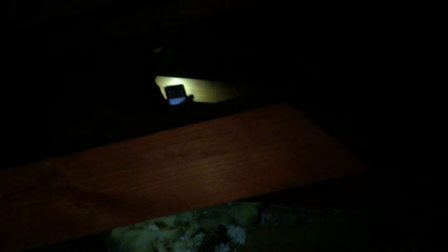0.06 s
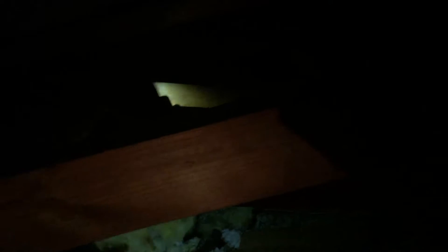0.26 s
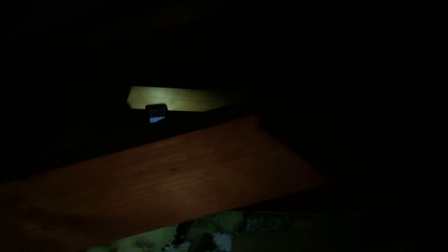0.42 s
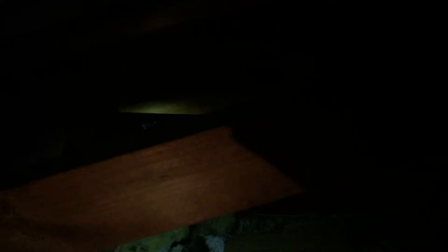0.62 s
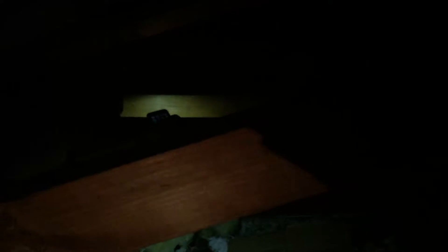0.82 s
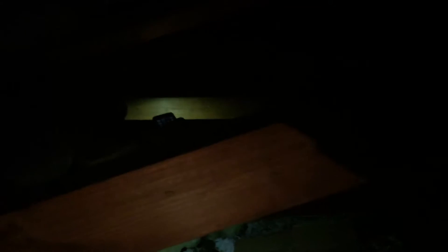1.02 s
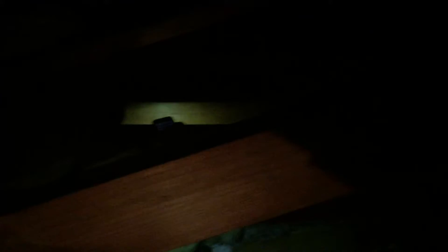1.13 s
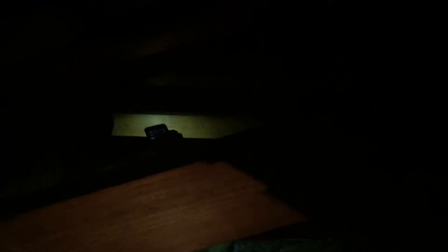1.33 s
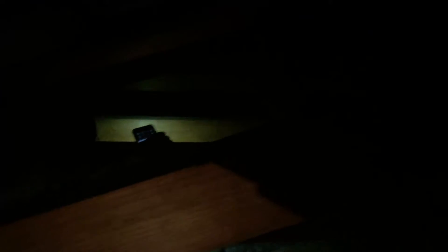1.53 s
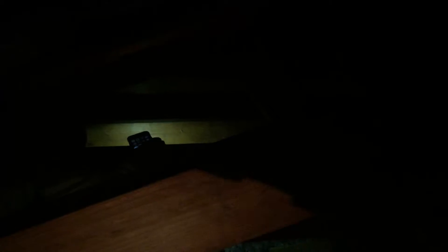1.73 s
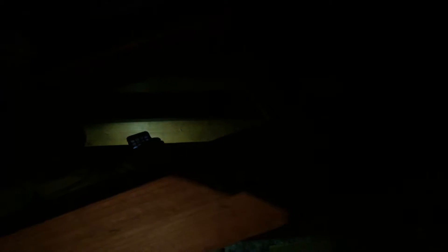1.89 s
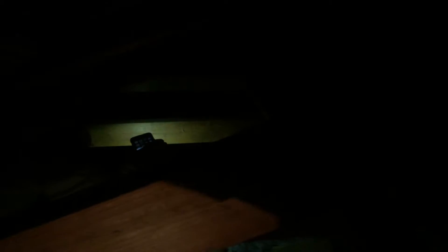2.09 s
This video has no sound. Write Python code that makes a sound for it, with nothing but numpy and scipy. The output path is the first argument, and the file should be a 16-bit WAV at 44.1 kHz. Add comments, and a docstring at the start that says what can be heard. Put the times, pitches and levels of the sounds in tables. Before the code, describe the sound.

Dry, brittle snapping clicks over low microphone handling rumble, then a hollow knock on wood.

```python
"""Shifting about in a cramped attic

A hand-held camera rumbles and is bumped by the hand, over faint hiss, rustling clothes and the tick
of its circuits. Among a few soft scuffs, something dry and brittle snaps in a short run of clicks,
each a crack with a resonant decay and a close echo. Last, a knock rings a board's hollow modes."""
import sys
import numpy as np
from scipy import signal
from scipy.fft import rfft, irfft, next_fast_len
from scipy.io import wavfile

SR = 44100
rng = np.random.default_rng(int(sys.argv[2]) if len(sys.argv) > 2 else 0)


def persist_wave(psi):
    """Save psi, clipped to +-1, as 16-bit WAV."""
    counts = np.round(np.clip(psi, -1, 1) * 32767).astype(np.int16)
    wavfile.write(sys.argv[1], SR, np.atleast_2d(counts).T)


N = 94815
AGE = np.arange(SR // 2) / SR  # time since an event's onset [s]


def amp(db):
    """Amplitude grows tenfold for every 20 dB."""
    return 10 ** (np.asarray(db) / 20)


def unit(x):
    """Normalisation to an rms of 1."""
    return x / np.sqrt(np.mean(x ** 2) + 1e-20)


def along(points, hz):
    """Interpolation of (frequency [Hz], level [dB]) points on a logarithmic frequency axis."""
    freqs, levels = np.transpose(points)
    return np.interp(np.log(hz + 1), np.log(freqs + 1), levels)


def envelope(points):
    """Amplitude envelope through (time [s], level [dB]) points."""
    return amp(np.interp(np.arange(N) / SR, *np.transpose(points)))


def noise(colour_db, size=len(AGE)):
    """Spectral shaping: white noise weighted by a dB function of frequency, at an rms of 1."""
    hz = np.fft.rfftfreq(size, 1 / SR)
    return unit(irfft(rfft(rng.standard_normal(size)) * amp(colour_db(hz)), size))


def decay(t60, delay=0):
    """Exponential decay by 60 dB in t60 seconds, starting after a delay."""
    return (AGE >= delay) * np.exp(-np.log(1000) * np.abs(AGE - delay) / t60)


def ring(modes):
    """Modal superposition: damped sinusoids, each excited with random strength and sign."""
    chance = rng.standard_normal((len(modes), 2))
    return sum(amp(db + 2 * spread) * np.sign(side) * decay(t60) * np.sin(2 * np.pi * hz * AGE)
               for (hz, db, t60), (spread, side) in zip(modes, chance))


def add(track, start, sound):
    """Superposition of a sound on the track from a start time in seconds."""
    part = track[max(round(start * SR), 0):][:len(sound)]
    part += sound[:len(part)]


def handling():
    """Structure-borne noise: the camera body rumbles in the hand while the fingers rub on it."""
    # course of the rumble and of the rubbing: (time [s], relative level [dB])
    rumble_levels = [(0.0, -41), (0.11, -48), (0.22, -44), (0.5, -42), (1.07, -46), (1.76, -45.5),
                     (1.89, -50.5), (2.15, -52)]
    grip_levels = [(0, -63), (.6, -62), (.85, -59), (.92, -41), (1.0, -64.5), (1.2, -52), (1.33, -51.5),
                   (1.42, -64.5), (1.6, -68), (1.7, -55), (1.9, -62.5), (2.15, -53.5)]
    # their spectra: (frequency [Hz], relative level [dB])
    rumble_colour = [(15, -57), (25, -28.5), (35, -4), (47, 0), (62, -0.5), (80, -6.5), (105, -12),
                     (150, -31), (220, -34.5), (320, -57.5), (600, -69), (1500, -110)]
    grip_colour = [(40, -26), (80, -10.5), (110, 10.5), (170, -2), (260, -27.5), (400, -33.5), (900, -68),
                   (2000, -118)]
    rumble = amp(2.5) * envelope(rumble_levels) * noise(lambda hz: along(rumble_colour, hz), N)
    rubbing = envelope(grip_levels) * noise(lambda hz: along(grip_colour, hz), N)
    return rumble + rubbing


def hiss():
    """Stationary broadband noise forms a faint floor."""
    # spectrum of the hiss: (frequency [Hz], relative level [dB])
    colour = [(160, -20.5), (280, -1.5), (420, -7), (640, -10.5), (900, -11.5), (1400, -15), (1950, -11.5),
              (2500, -16.5), (4400, -16), (5000, -19.5), (5500, -18.5), (6700, -20), (7700, -22.5),
              (9500, -21), (10600, -26), (12000, -24), (15500, -26.5)]
    return amp(-72.5) * noise(lambda hz: along(colour, hz), N)


def rustle():
    """Friction noise of clothing, modulated by single fibres that catch at random."""
    # course of the rustle: (time [s], level [dB])
    levels = [(0, -79), (.08, -76), (.24, -75.5), (.33, -70.5), (.5, -86), (.6, -74), (.82, -75.5),
              (.92, -84), (1.1, -90.5), (2.15, -84.5)]
    # its spectrum: (frequency [Hz], relative level [dB])
    colour = [(300, 1.5), (900, 3), (2200, -6), (4200, -7), (7000, -15), (10000, -25), (14000, -40)]
    catches_per_s, relax_s = 120, 0.008
    catches = (rng.random(N) < catches_per_s / SR) * rng.exponential(size=N)
    grain = unit(signal.lfilter([1], [1, -np.exp(-1 / (relax_s * SR))], catches))
    roughness = np.sqrt(0.5 + 0.5 * grain ** 2)  # the catches carry half the power
    return envelope(levels) * roughness * noise(lambda hz: along(colour, hz), N)


def electronics():
    """Pulse modulation of a high tone: the camera's circuits tick faintly twice a frame."""
    # electrical ticks: (time within the frame [s], peak level [dB])
    ticks = [(.002, -73.5), (.0157, -74)]
    frame_hz, whine_hz, width_s = 30, 9450, 0.0003
    t = np.arange(N) / SR
    pulses = np.zeros(N)
    for centre, db in ticks:
        offset_s = (((t - centre) * frame_hz + 0.5) % 1 - 0.5) / frame_hz
        pulses += amp(db) * np.exp(-(offset_s / width_s) ** 2)
    return pulses * np.sin(2 * np.pi * whine_hz * t)


def scuffs():
    """Damped resonance: each soft brush or tap is a burst of noise in one band."""
    # brushes and taps: (time [s], level [dB], centre [Hz], width [octaves], rise [s], t60 [s])
    touches = [(0.064, -75, 4200, .3, 0.0073, 0.21), (0.159, -69.5, 3620, 0.23, 0.013, 0.19),
               (.295, -56, 790, 0.36, 0.013, .16), (.415, -66, 1608, 0.02, 0.0028, 0.1),
               (.618, -49, 413, 0.51, 0.0023, 0.13), (0.618, -51.5, 1210, 0.12, 0.00076, 0.071),
               (0.619, -42, 178, 0.44, 0.0018, 0.15), (.93, -69.5, 910, .8, 0.014, 0.24),
               (1.375, -71, 800, 0.25, .005, 0.12), (1.7968, -54.5, 1150, 0.23, 0.0012, 0.076),
               (1.798, -67, 2700, 0.46, 0.0006, 0.04), (2.09, -44, 141.3, 0.099, .005, 0.29)]
    out = np.zeros(N)
    for start, db, centre_hz, width, rise, t60 in touches:
        band = noise(lambda hz: -20 * np.log10(1 + (np.log2((hz + 1) / centre_hz) / width) ** 4 / 2))
        add(out, start, amp(db) * band * (1 - np.exp(-AGE / rise)) * decay(t60))
    return out


def bumps():
    """Transient response: a soft push gives a few cycles that sag to the camera body's own pitch."""
    # pushes of the hand: (time [s], level before filtering [dB], time scale [s], starting pitch [Hz])
    pushes = [(0.117, -33.5, 0.017, 126), (0.193, -33, 0.022, 110), (0.258, -33, 0.019, 222),
              (0.319, -43, 0.016, 190), (0.419, -39, 0.029, 132), (0.501, -31.5, 0.023, 183),
              (0.632, -25, 0.019, 118), (0.6774, -20.5, 0.022, 270), (0.801, -29.5, 0.031, 116),
              (0.9, -37, 0.014, 253), (0.946, -38, 0.011, 282), (1.0679, -21.5, 0.02, 281),
              (1.28, -43.5, 0.013, 220), (1.2945, -28.5, .011, 196), (1.678, -33, 0.013, 210),
              (1.7632, -27.5, 0.0089, 360), (1.8285, -30, 0.016, 258)]
    body_hz, sag_s, soft_hz = 57.9, 0.0053, 398
    out = np.zeros(N)
    for start, db, length, start_hz in pushes:
        pitch = body_hz + (start_hz - body_hz) * np.exp(-AGE / sag_s)
        swell = (AGE / length) ** 1.23 * np.exp(-(AGE / length) ** 2)
        add(out, start, -amp(db) * swell / swell.max() * np.sin(2 * np.pi * np.cumsum(pitch) / SR))
    soft_hand = signal.butter(4, soft_hz, fs=SR, output="sos")  # a soft contact passes only lows
    return signal.sosfiltfilt(soft_hand, out)


def snaps():
    """Impulse excitation: a brittle crack is followed by an echo, a quick ring and reverberation."""
    # dry snaps: (time [s], level [dB], body [dB], edge [dB], air [dB], t60 [s],
    # resonance [Hz], resonance height [dB], opening crack [dB])
    clicks = [(0.5458, -65, -6, 1, 5, 0.043, 4030, 10, -2), (0.574, -67, -12, 5, 30, 0.068, 3000, -2, -12),
              (0.5806, -45, 20, 4.5, 4, 0.13, 3000, 15.5, -16),
              (0.599, -54.5, 2, 8, 13.5, 0.15, 5450, 10.5, -12),
              (0.6477, -44, 5.5, -3.5, 0.5, 0.088, 2870, 10, 5.5),
              (0.6871, -55, 8, 6, 22, 0.12, 3520, 17.5, -2), (0.7112, -36, 2, -7, -2, 0.097, 4440, 7.5, 0),
              (0.7523, -42.5, 7, -1, 2, 0.075, 4570, 8.5, 4.5),
              (0.8477, -58, 9, 13.5, 17, 0.11, 4400, 9, -12)]
    # spectrum common to all snaps: (frequency [Hz], relative level [dB])
    base_colour = [(200, -51), (700, -44), (1200, -18.5), (1500, -20.5), (1800, -10.5), (2400, -11.5),
                   (2900, -6), (3400, -4), (3900, 1.5), (4700, 0), (5300, -3), (6200, -8), (7500, -14),
                   (10000, -29.5), (15500, -38)]
    # modes of the brittle object: (frequency [Hz], relative level [dB], t60 [s])
    modes = [(1740, -6, 0.12), (2780, -3, 0.1), (3885, 1, 0.048), (4320, 1, 0.092), (4695, -14, 0.26),
             (4870, -1.5, 0.061)]
    half_width_hz, build_s = 150, 0.0007
    build = 1 - np.exp(-AGE / build_s)  # the dense ring grows as echoes gather
    rafter_echo = amp(-1.5) * decay(t60=0.024, delay=0.0013)
    attic_tail = amp(-18) * decay(t60=0.2)
    out = np.zeros(N)
    for start, db, body_db, edge_db, air_db, t60, peak_hz, peak_db, crack_db in clicks:
        tone = [(1500, body_db), (4000, 0), (7000, edge_db), (11000, air_db)]
        resonance = lambda hz: peak_db / (1 + ((hz - peak_hz) / half_width_hz) ** 2)
        burst = noise(lambda hz: along(base_colour, hz) + along(tone, hz) + resonance(hz))
        crack = amp(crack_db) * decay(t60=0.0054)
        parts = [crack, rafter_echo, build * decay(t60), attic_tail]
        contour = np.linalg.norm(parts, axis=0)  # incoherent parts add in power
        add(out, start, amp(db) * (burst * contour + amp(-13) * ring(modes)))
    return out


def knock():
    """Free vibration: a board struck in a quick cluster of contacts rings hollow in its modes."""
    # contacts, and bright ticks where the wood catches: (time [s], level [dB])
    contacts = [(2.062, -50), (2.067, -47.5), (2.0714, -44.5), (2.082, -58), (2.093, -60)]
    ticks = [(2.062, -60), (2.082, -66.5)]
    # modes of the board: (frequency [Hz], relative level [dB], t60 [s])
    modes = [(286, -6.5, 0.087), (358.5, 5.5, .09), (430, 5.5, 0.053), (513, -6, 0.15), (575, -5, 0.19),
             (666, -8, .12), (781, -13, 0.11), (923, -11, 0.15), (1180, -10, .09), (1615, -9, 0.025),
             (1780, -12, 0.064), (2860, -19, 0.057)]
    # spectra of thud and tick: (frequency [Hz], relative level [dB])
    thud_colour = [(100, -13), (350, 7), (900, -4), (1800, -11), (3000, -20.5), (5500, -35), (7500, -25),
                   (10000, -34.5), (12000, -41), (15500, -42)]
    tick_colour = [(2000, -27), (5500, -7), (7300, 2), (10000, -7), (11500, -29), (15000, -14)]
    rise_s = 0.00097
    attack = 1 - np.exp(-AGE / rise_s)
    out = np.zeros(N)
    for start, db in contacts:
        thud = noise(lambda hz: along(thud_colour, hz)) * decay(t60=0.092)
        add(out, start, amp(db) * attack * (amp(-2) * ring(modes) + amp(-3) * thud))
    for start, db in ticks:
        add(out, start, amp(db) * noise(lambda hz: along(tick_colour, hz)) * decay(t60=0.065))
    return out


def scene():
    """Linear superposition of all sources at one microphone."""
    return (handling() + hiss() + rustle() + electronics() + scuffs() + bumps() + snaps() + knock())[None]


def record(dry):
    """Band limiting: the camera thins the deepest bass and passes nothing above its upper limit."""
    low_cut_hz, top_hz = 32, 15850
    size = next_fast_len(N + SR // 2)
    hz = np.fft.rfftfreq(size, 1 / SR)
    low_cut = hz ** 4 / (hz ** 4 + low_cut_hz ** 4)
    return irfft(rfft(dry, size) * low_cut * (hz < top_hz), size)[:, :N]


dry = scene()
out = record(dry)
persist_wave(out)
```